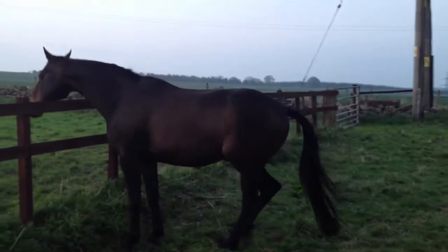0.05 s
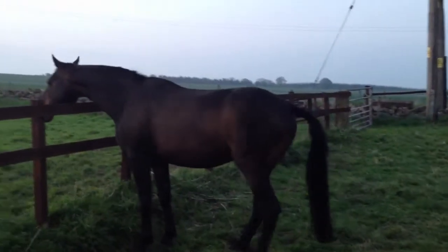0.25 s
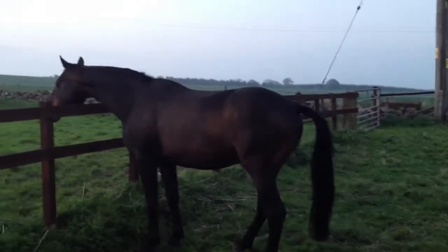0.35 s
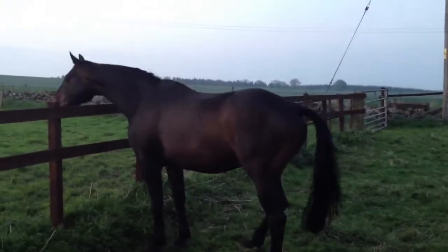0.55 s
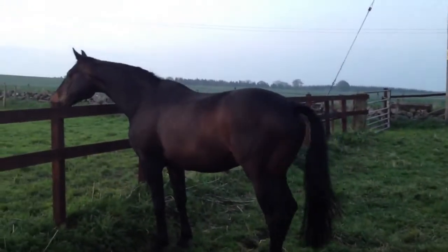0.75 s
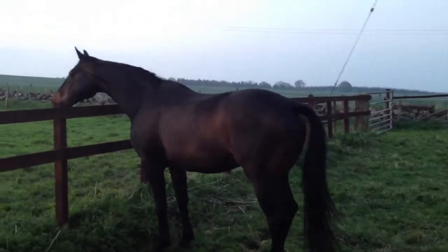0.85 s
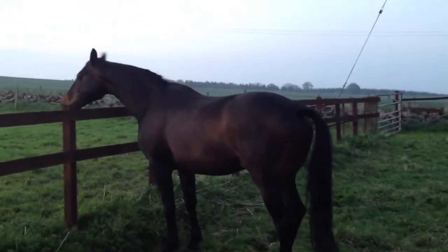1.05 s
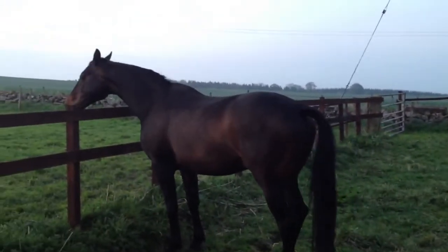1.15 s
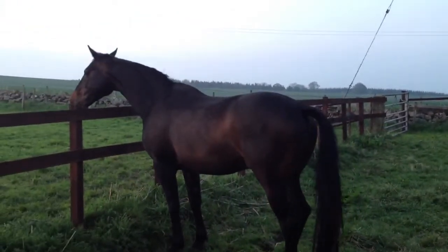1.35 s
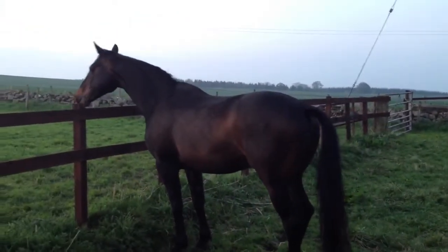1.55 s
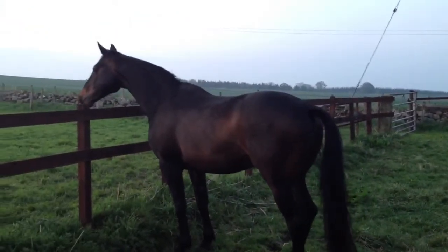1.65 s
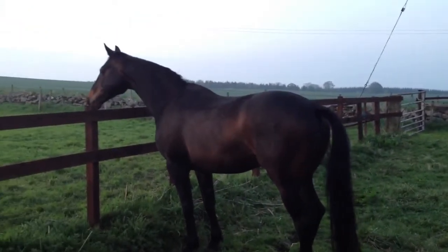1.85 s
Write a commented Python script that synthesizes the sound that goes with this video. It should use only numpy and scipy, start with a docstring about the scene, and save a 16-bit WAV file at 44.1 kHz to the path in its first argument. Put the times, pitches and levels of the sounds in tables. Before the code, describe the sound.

One low hoof thump sounds near the microphone in a quiet field, with grass and tail rustling and a few stalks ticking. Faint gliding bird whistles follow, then a soft breath from the horse, while small birds twitter far off.

```python
"""A horse's hind hoof lands with one low thump by a wooden fence in a field: the impact excites
damped modes, heard as a crack, a knock and a hollow ring. Tail and grass rustle by friction, and
snapping stalks give sharp ticks. A soft, low rush follows, probably the horse blowing out: turbulence
filtered by airway resonances. One songbird whistles a phrase in gliding, nearly pure tones, and
smaller birds twitter farther off, blurred by reflections, over the steady noise of open air."""
import sys
import numpy as np
from scipy import signal
from scipy.io import wavfile
from scipy.ndimage import uniform_filter1d

SR = 44100
rng = np.random.default_rng(int(sys.argv[2]) if len(sys.argv) > 2 else 0)


def generate_wav(signal):
    """Clip the signal to [-1, 1] and save it as 16-bit WAV at the path in sys.argv[1]."""
    frames = np.transpose(np.atleast_2d(signal))
    scaled = np.clip(frames, -1, 1) * 32767
    pcm = np.round(scaled).astype(np.int16)
    wavfile.write(sys.argv[1], SR, pcm)


N = 83790
T = np.arange(N) / SR

# spectrum of the open air: f/Hz, relative level/dB
AIR_SPECTRUM = [(40, -29.5), (120, -5), (280, 3), (500, -6.5), (1000, -8.5), (2000, -7.5), (4500, -8.5),
                (6500, -14), (10000, -22.5), (13000, -14), (15500, -17)]
# buzzy notes and far twitter: t/s, duration/s, first f/Hz, last f/Hz, level/dB, trill depth (0-1)
FAR_CHIRPS = [(-0.02, 0.06, 3133, 3015, -58, 0.8), (0.062, 0.045, 3230, 3270, -68.5, 0.8),
              (-0.02, 0.19, 1767, 1636, -70, 1), (0.526, 0.14, 3300, 3400, -71, 0.13),
              (0.668, 0.111, 4120, 3907, -66.5, 0.3), (1.154, 0.037, 4140, 4380, -64.5, .1),
              (1.186, 0.048, 4980, 4480, -65, 0.12), (1.265, 0.02, 5970, 4870, -68.5, 0.27),
              (1.283, 0.06, 4650, 4200, -68.5, 0.66), (1.392, 0.048, 4950, 4610, -67, 0.1),
              (1.444, 0.172, 3280, 3363, -70, 0.44), (1.575, 0.017, 4170, 4240, -61, 0.28),
              (1.604, 0.048, 4740, 4530, -64, 0), (1.807, 0.033, 4250, 4267, -62.5, 0.46),
              (1.843, 0.017, 4260, 4340, -59.5, 0.2), (1.864, 0.023, 4340, 4290, -62, 0.05)]
# the near bird's whistles, one contour each: t/s, f/Hz, level/dB
WHISTLE_CONTOURS = [
    [(0.365, 1480, -67), (0.388, 1615, -57.5), (0.415, 1604, -51), (0.46, 1665, -65)],
    [(0.505, 2020, -62), (0.542, 1817, -57.5), (0.6, 2187, -53.5), (0.675, 2328, -61), (0.705, 2265, -53.5),
     (0.735, 2164, -63.5), (0.8, 2065, -53.5), (0.86, 2068, -60.5)],
    [(0.915, 2636, -65), (0.945, 3012, -57.5), (0.97, 3034, -53.5), (1.0, 2997, -62), (1.057, 2998, -53.5),
     (1.113, 3010, -66)],
    [(1.06, 1800, -60), (1.083, 2315, -58), (1.1, 2327, -51.5), (1.138, 2280, -60)],
]
# envelope of the tail and grass rustle: t/s, level/dB
RUSTLE_ENVELOPE = [(0.08, -62), (0.135, -63.5), (0.18, -61), (0.235, -47.5), (0.33, -58.5), (0.44, -56),
                   (0.51, -54.5), (0.63, -61.5), (0.72, -68.5), (0.83, -69), (1.9, -77)]
# spectrum of the rustle: f/Hz, relative level/dB
RUSTLE_SPECTRUM = [(60, -53), (400, -7), (1100, -4), (2500, -3.5), (4000, -1), (6000, -1), (7200, -4),
                   (9000, -1.5), (11000, -10), (15500, -13.5)]
# snapping stalks and small ticks: t/s, relative level/dB, T60/s, lower f/Hz, upper f/Hz
SNAPS = [(0.0586, -41.5, 0.047, 3530, 9700), (0.171, -40.5, 0.02, 2940, 10300),
         (0.2346, -34, 0.028, 1880, 6060), (0.2869, -36, 0.021, 3070, 6360),
         (0.47, -45.5, 0.027, 900, 9000), (0.511, -45, 0.025, 2500, 11000), (0.565, -45, 0.031, 2500, 8000),
         (0.616, -53.5, 0.27, 6200, 14800), (0.9836, -42, 0.042, 1300, 13600),
         (1.004, -52.5, 0.039, 3500, 12000), (1.0768, -43, 0.035, 2380, 8750),
         (1.382, -55, 0.018, 5060, 13800), (1.5103, -44.5, 0.02, 1200, 11900)]
# filter common to all snaps: f/Hz, relative level/dB
SNAP_SPECTRUM = [(300, 8), (1500, 6), (2500, 2), (4000, -2.5), (6300, 4), (7600, -0.5), (10500, 2),
                 (16000, 3.5)]
# envelope of the horse's blow: t/s, level/dB
BLOW_ENVELOPE = [(0.88, -79), (0.94, -58.5), (1.03, -58.5), (1.16, -60), (1.3, -56.5), (1.44, -57),
                 (1.53, -62.5), (1.62, -66), (1.85, -83)]
# airway resonances: f/Hz, bandwidth/Hz, relative level/dB
AIRWAY_RESONANCES = [(252.8, 100, -7), (367.7, 77, -2.5), (485, 160, -5), (759, 135, -0.5), (1201, 900, -6),
                     (3904, 4700, -10)]
# hard contacts of the hoof: t/s, level/dB
HOOF_CONTACTS = [(0.2317, -35), (0.2364, -41), (0.266, -52.5)]
# modes excited by each contact: f/Hz, relative level/dB, T60/s
CONTACT_MODES = [(401, -2, 0.027), (650, -3, 0.022), (1030, -6, 0.021), (1235, -3, 0.063),
                 (3770, -5, 0.053), (5980, -10, 0.042)]
# spectrum of each contact's dry crack: f/Hz, relative level/dB
CRACK_SPECTRUM = [(60, -10), (500, 5.5), (1300, -4), (2600, -14), (3700, -8), (6300, -4), (8000, -37),
                  (15000, -24)]
# weight of the hoof landing and settling: t/s, peak level/dB, f/Hz
HOOF_THUDS = [(0.2309, -26, 197), (0.262, -38, 192), (0.285, -42, 207)]
# modes of the hollow ring after the landing: f/Hz, relative level/dB, T60/s
HOLLOW_MODES = [(182, -33, 0.33), (215.5, -37.5, 0.36), (141, -46, 0.48)]
# the thump scattering over the ground: lower f/Hz, upper f/Hz, level/dB, T60/s
GROUND_SCATTER = [(390, 990, -49, 0.37), (93, 360, -55, 0.98)]


def amp(db):
    """Amplitude ratio of a level in decibels."""
    return 10 ** (np.asarray(db) / 20)


def unit_rms(x):
    """Normalisation to unit mean power."""
    return x / np.sqrt(np.mean(x ** 2) + 1e-20)


def envelope(points):
    """Amplitude from levels interpolated linearly in decibels."""
    return amp(np.interp(T, *np.transpose(points)))


def colour(x, spectrum):
    """Minimum-phase filtering at unit energy: being causal, it puts no sound ahead of an attack."""
    hz, db = np.transpose(spectrum)
    bin_hz = abs(np.fft.fftfreq(4096, 1 / SR))
    log_gain = np.log(amp(np.interp(np.log(bin_hz + 1), np.log(hz), db)))
    response = np.exp(np.conj(signal.hilbert(log_gain)))
    taps = np.fft.ifft(response).real[:2048]
    return signal.fftconvolve(x, taps / np.linalg.norm(taps))[:len(x)]


def band(x, low_hz, top_hz, order=2):
    """Band-pass filtering between two edge frequencies."""
    edges = np.clip([low_hz, top_hz], 10, SR / 2 - 1)
    return signal.sosfilt(signal.butter(order, edges, "band", fs=SR, output="sos"), x)


def noise():
    """White noise: equal power per unit bandwidth."""
    return rng.standard_normal(N)


def since(start):
    """Elapsed time in seconds, zero before start."""
    return np.maximum(T - start, 0)


def decay(start, t60):
    """Exponential damping after a sudden onset: 60 dB in t60 seconds."""
    return (T >= start) * np.exp(-np.log(1000) * since(start) / t60)


def ring(start, modes):
    """Free vibration after a blow: a superposition of damped sinusoids."""
    return sum(amp(db) * decay(start, t60) * np.sin(2 * np.pi * hz * since(start))
               for hz, db, t60 in modes)


def resonance(hz, width_hz):
    """A randomly driven resonator yields narrow-band noise about its centre frequency."""
    lowpass = signal.butter(2, width_hz / 2, fs=SR, output="sos")
    baseband = signal.sosfilt(lowpass, noise() + 1j * noise())
    cycles = np.cumsum(hz * np.ones(N)) / SR
    return unit_rms((baseband * np.exp(2j * np.pi * cycles)).real)


def field_echo(x, t60, reflections_per_s=2000):
    """Reverberation: walls and trees return sparse, decaying reflections."""
    taps = noise() * (rng.random(N) < reflections_per_s / SR) * decay(.006, t60)
    return signal.fftconvolve(x, taps / np.linalg.norm(taps))[:N]


def open_air(level_db=-68):
    """Ambient sound: stationary broadband noise, strongest at low frequencies."""
    return amp(level_db) * colour(noise(), AIR_SPECTRUM)


def bird_note(start, end, hz, db, trill_depth, trill_hz=99.4, ramp_s=.007):
    """A wavering tone; a trill modulates its frequency and amplitude, and the sidebands make a buzz."""
    waver, rate_jitter = (unit_rms(uniform_filter1d(noise(), size=300)) for _ in range(2))
    trill_cycles = np.cumsum(trill_hz * (1 + 0.236 * rate_jitter)) / SR
    trill = trill_depth * np.sin(2 * np.pi * trill_cycles)
    gate = np.clip(np.minimum(T - start, end - T) / ramp_s, 0, 1)
    cycles = np.cumsum(hz * (1 + 0.0031 * waver + 0.063 * trill)) / SR
    return np.sqrt(2) * amp(db) * gate * (1 + 0.33 * trill) * np.sin(2 * np.pi * cycles)


def far_birds():
    """Short frequency sweeps; at a distance the reflected sound nearly equals the direct sound."""
    direct = np.zeros(N)
    for start, duration, first_hz, last_hz, db, trill_depth in FAR_CHIRPS:
        end = start + duration
        sweep_hz = np.interp(T, [start, end], [first_hz, last_hz])
        direct += bird_note(start, end, sweep_hz, db, trill_depth)
    return direct + amp(-3) * field_echo(direct, t60=.75)


def near_bird(buzz_after_s=.2, buzz_rise_s=0.057, flutter_db=2.6):
    """Gliding tones whose level fluctuates in propagation through air; a long one ends in a buzz."""
    direct = np.zeros(N)
    for contour in WHISTLE_CONTOURS:
        times, hz, db = np.transpose(contour)
        buzz = 0.87 * np.minimum(since(times[0] + buzz_after_s) / buzz_rise_s, 1)
        direct += bird_note(times[0], times[-1], np.interp(T, times, hz), np.interp(T, times, db), buzz)
    direct *= amp(flutter_db * unit_rms(band(noise(), 8, 105)))
    return direct + amp(-10) * field_echo(direct, t60=1.1)


def rustle(flicker_db=1.6):
    """Friction noise of tail hair and grass blades, modulated in amplitude as tufts catch."""
    flicker = amp(flicker_db * unit_rms(band(noise(), 33, 235)))
    hiss = unit_rms(flicker * noise())
    return envelope(RUSTLE_ENVELOPE) * colour(hiss, RUSTLE_SPECTRUM)


def stalk_snaps(spike_over_spray_db=17):
    """Sudden fracture radiates an impulse followed by a bright, decaying spray of noise."""
    snaps = np.zeros(N)
    for start, db, t60, low_hz, top_hz in SNAPS:
        burst = noise() * decay(start, t60)
        burst[round(start * SR)] = amp(spike_over_spray_db)
        snaps += amp(db) * band(burst, low_hz, top_hz)
    return colour(snaps, SNAP_SPECTRUM)


def horse_blow(swell_peak_s=1.55, swell_db_per_s=11.5, upper_above_hz=600):
    """Turbulence drives airway resonances: the low ones slide up at first, the upper swell and climb."""
    onset = BLOW_ENVELOPE[0][0]
    swell = amp(-swell_db_per_s * abs(T - swell_peak_s))
    early_slide = 1 - .4 * np.exp(-since(onset) / .07)
    late_climb = 1 + 0.47 * since(1.38)
    breath = np.zeros(N)
    for hz, width_hz, db in AIRWAY_RESONANCES:
        if hz > upper_above_hz:
            breath += amp(db) * swell * resonance(hz * late_climb, width_hz)
        else:
            breath += amp(db) * resonance(hz * early_slide, width_hz)
    return envelope(BLOW_ENVELOPE) * unit_rms(breath)


def hoof(crack_gain_db=22.5, thud_peak_s=.008, thud_shape=2.2, hollow_rise_s=0.06):
    """Impact: brief contacts excite a crack and a knock, the slower loading a low thud that rings on."""
    landing = HOOF_THUDS[0][0]
    impulses, knocks, thuds = np.zeros((3, N))
    for start, db in HOOF_CONTACTS:
        impulses[round(start * SR)] = amp(db + crack_gain_db)
        knocks += amp(db) * ring(start, CONTACT_MODES)
    cracks = colour(impulses, CRACK_SPECTRUM)
    for start, db, hz in HOOF_THUDS:
        age = since(start) / thud_peak_s
        pulse = age ** thud_shape * np.exp(thud_shape * (1 - age ** 2) / 2)  # peaks at 1 when age is 1
        thuds += amp(db) * pulse * np.sin(2 * np.pi * hz * since(start))
    hollow = ring(landing, HOLLOW_MODES) * (1 - np.exp(-since(landing) / hollow_rise_s))
    scatter = sum(amp(db) * decay(landing, t60) * unit_rms(band(noise(), low_hz, top_hz, order=3))
                  for low_hz, top_hz, db, t60 in GROUND_SCATTER)
    return cracks + knocks + thuds + hollow + scatter


def scene():
    """Superposition: the pressures of air, horse and birds add in one channel."""
    air = open_air()
    horse = hoof() + stalk_snaps() + rustle() + horse_blow()
    birds = near_bird() + far_birds()
    return (air + horse + birds)[None]


def record(dry, bass_cut_hz=80, band_limit_hz=15550):
    """The microphone acts as a band-pass system, cutting deep bass and the highest treble."""
    highpass = signal.butter(2, bass_cut_hz, "high", fs=SR, output="sos")
    lowpass = signal.firwin(511, band_limit_hz, window=("kaiser", 9), fs=SR)
    return signal.oaconvolve(signal.sosfilt(highpass, dry), lowpass[None], "same")


dry = scene()
out = record(dry)
generate_wav(out)
```